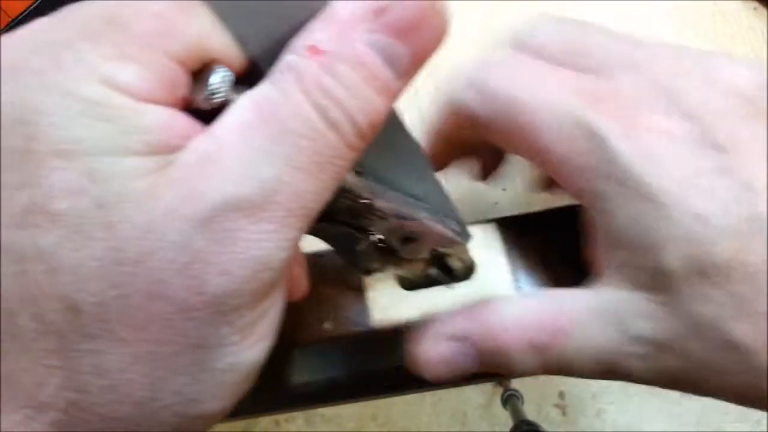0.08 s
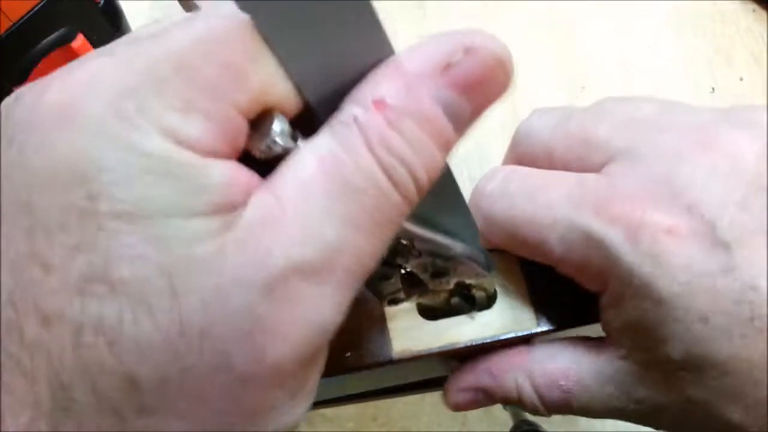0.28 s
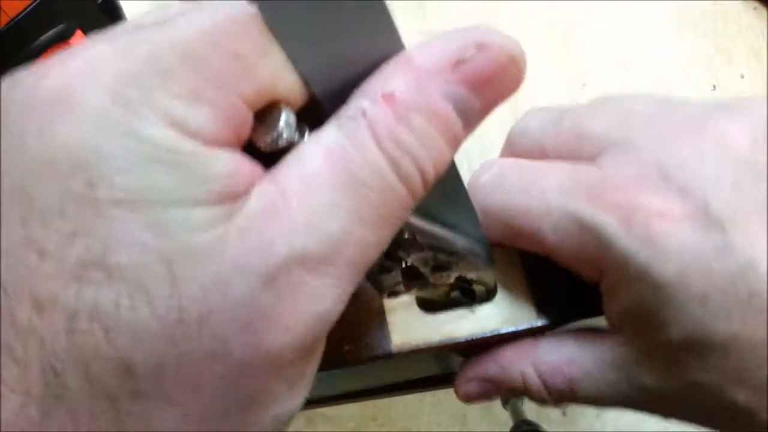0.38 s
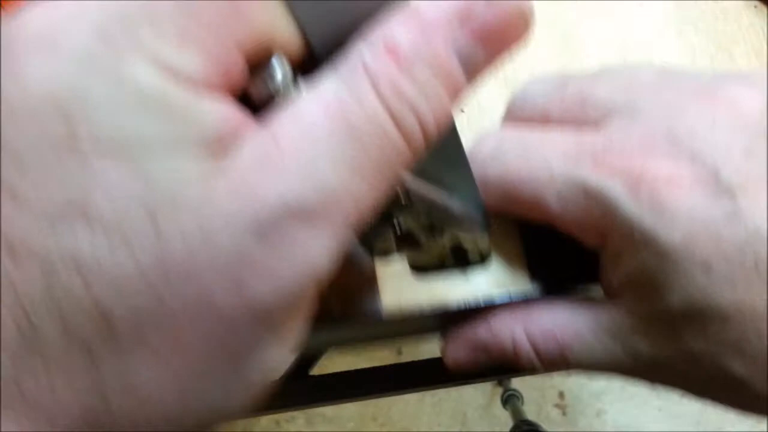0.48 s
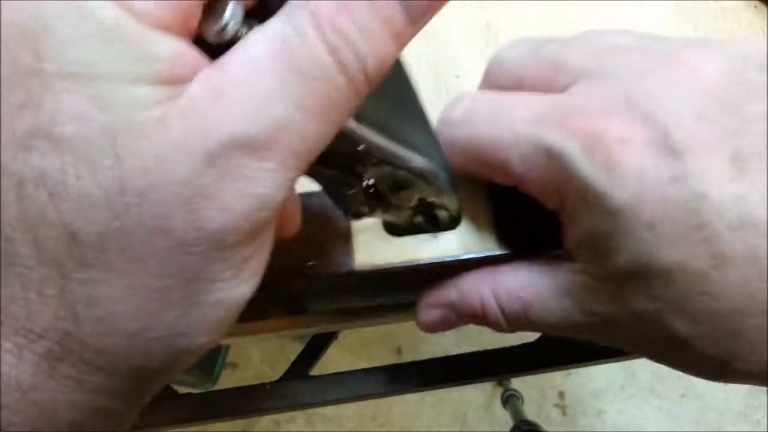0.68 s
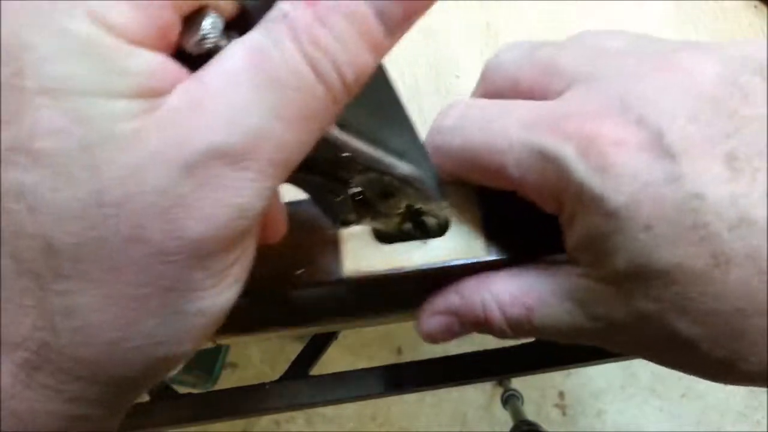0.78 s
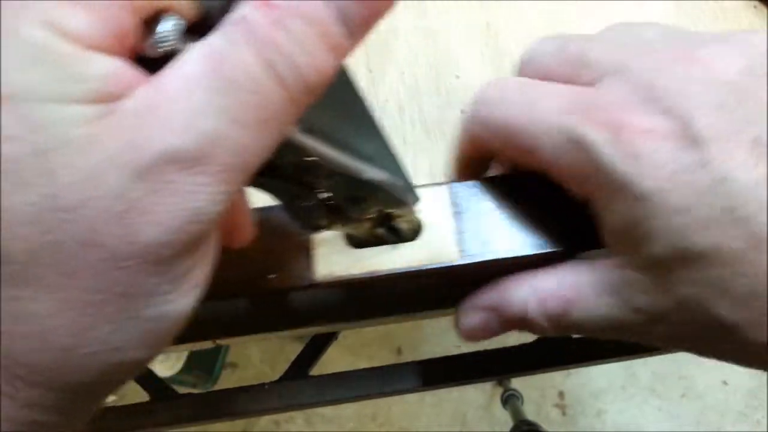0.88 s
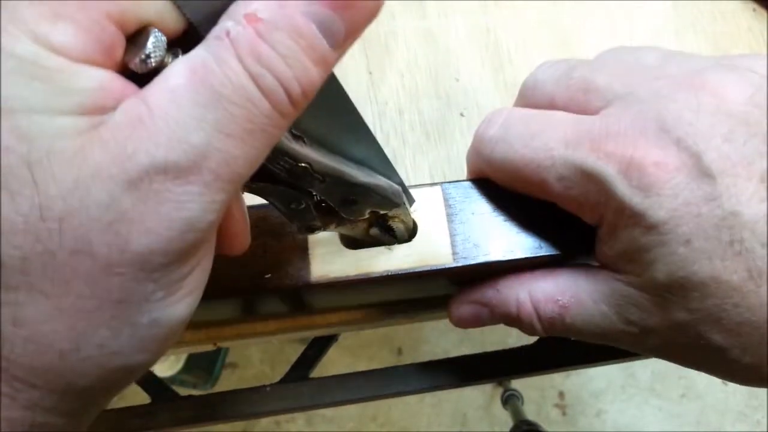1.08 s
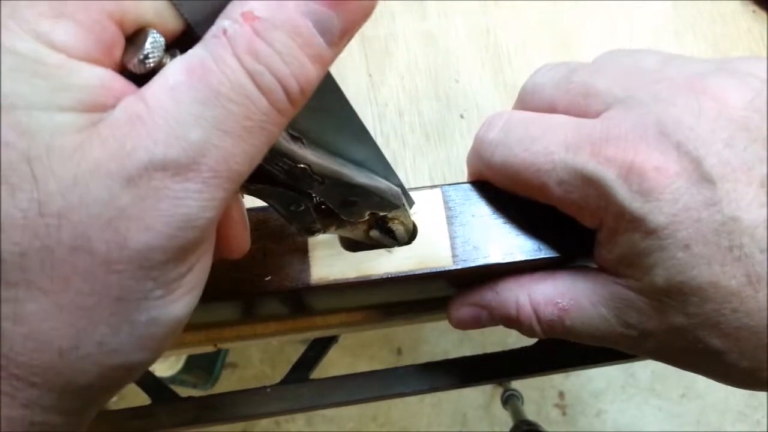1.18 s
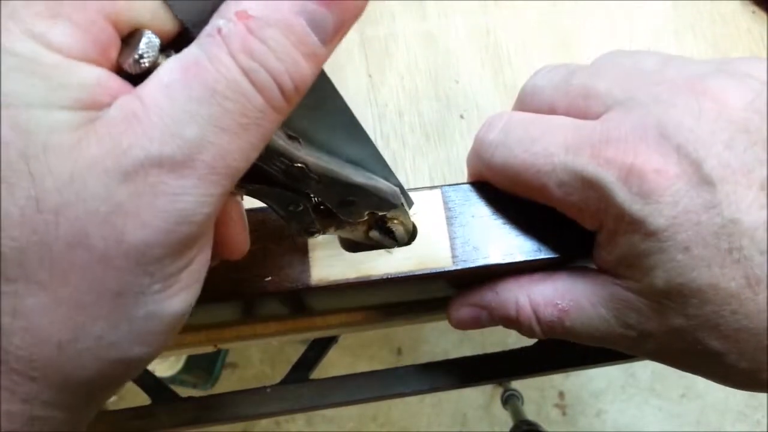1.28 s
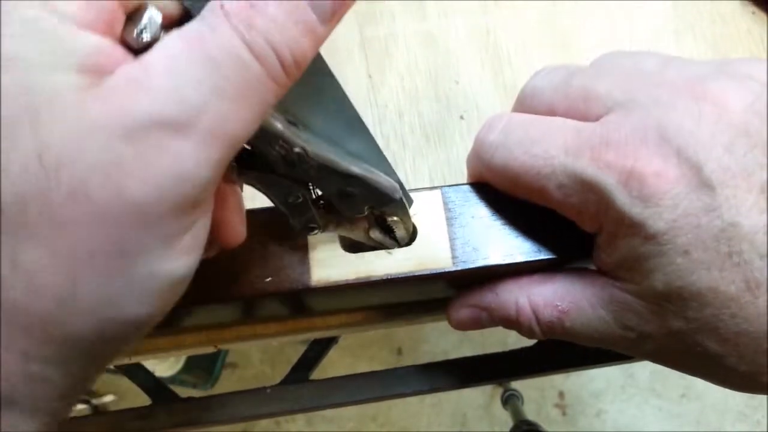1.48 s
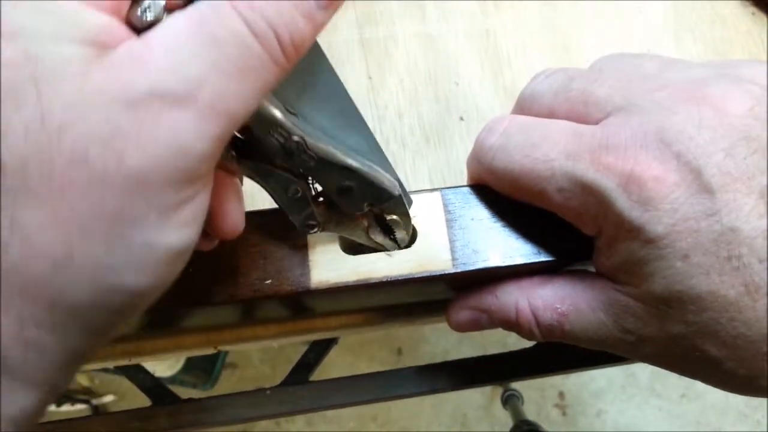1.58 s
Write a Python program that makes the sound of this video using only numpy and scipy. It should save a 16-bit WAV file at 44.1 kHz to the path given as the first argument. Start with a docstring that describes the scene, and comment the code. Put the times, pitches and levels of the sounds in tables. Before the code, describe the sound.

Two hard clattering knocks of pliers and rail on a bench, then faint scraping and metallic clicks

```python
"""Two hard knocks, each a quick run of contacts, ring a wooden rail through the modes of rail and steel plate.
Pliers lever a staple there: their jaws scrape as uneven grains before and after, and click twice as snap and ring.
Loose things on the bench rattle after each contact, and the workshop answers with decaying noise.
A small camera close by adds shaped noise for hiss and faint hum, two thin whines, and
the ticks of its sensor: filtered pulses thirty times a second, mostly in the left channel."""
import sys
import numpy as np
from scipy import signal
from scipy.fft import rfft, irfft, next_fast_len
from scipy.io import wavfile
from scipy.ndimage import uniform_filter1d

SR = 44100
rng = np.random.default_rng(int(sys.argv[2]) if len(sys.argv) > 2 else 0)


def unload_wav(signal):
    """Save mono or channel-first audio to the path in sys.argv[1] as 16-bit WAV at rate SR, clipped to [-1, 1]."""
    wavfile.write(
        sys.argv[1],
        SR,
        np.round(np.clip(np.atleast_2d(signal).T, -1, 1) * 32767).astype(np.int16),
    )


N = 72765
LEFT_RIGHT = np.array([[.5], [-.5]])  # shares of a left-minus-right difference


def amp(db):
    """Decibels to amplitude ratio."""
    return 10 ** (np.asarray(db) / 20)


def unit(x):
    """Scale to rms 1."""
    return x / np.sqrt(np.mean(x ** 2) + 1e-20)


def along(points, hz):
    """Interpolate (Hz, value) points along a logarithmic frequency axis."""
    f, v = np.transpose(points)
    return np.interp(np.log(hz + 1), np.log(f + 1), v)


def filtered(x, response):
    """Linear filtering: the spectrum of x times a complex response of frequency."""
    m = next_fast_len(N + SR // 2)
    hz = np.fft.rfftfreq(m, 1 / SR)
    return irfft(rfft(x, m) * response(hz), m)[..., :N]


def noise(spectrum):
    """Shaped random noise: two independent channels, together of rms 1."""
    white = rng.standard_normal((2, N))
    return unit(filtered(white, lambda hz: amp(along(spectrum, hz))))


def uneven_level(depth_db, samples):
    """Slow random modulation: smoothed noise as a gain that wanders by depth_db rms."""
    return amp(depth_db * unit(uniform_filter1d(rng.standard_normal(N), size=samples)))


def since(s):
    """Causality: seconds after s, and where they count."""
    t = np.arange(N) / SR - s
    return np.maximum(t, 0), t >= 0


ALIKE_HZ = 900  # below this both microphones hear nearly the same


def alike(pair):
    """Coherence of long waves: the difference of the two channels fades out towards the bass."""
    mid = pair.mean(axis=0)
    side = filtered((pair[0] - pair[1]) / 2, lambda hz: 1j * hz / (ALIKE_HZ + 1j * hz))
    return np.array([mid + side, mid - side])


# Hiss and faint hum. Each row: frequency in Hz, relative density in dB per Hz.
AIR = [(20, -100), (45, -90), (70, -80), (140, -76), (280, -79), (560, -86), (1130, -92), (2260, -96),
       (4500, -98), (6800, -100), (10500, -96), (15000, -99)]
AIR_DB = -51  # rms


def background():
    """Stationary noise: a fixed spectrum gives the hiss and the faint hum."""
    return amp(AIR_DB) * noise(AIR)


# Steady whines of the camera. Each row: frequency in Hz, level in dB rms.
WHINE = [(10186, -75), (12440, -74)]


def whines():
    """Pure tones: two sines with a random phase in each channel."""
    t = np.arange(N) / SR
    out = np.zeros((2, N))
    for hz, db in WHINE:
        phase = rng.uniform(0, 5.7, (2, 1))
        out += amp(db) * np.sqrt(2) * np.sin(2 * np.pi * hz * t + phase)
    return out


TICK_FIRST_S, TICK_EVERY_S, TICK_MS = .0002, .033279, 1.38
TICK_DB = -25.4  # of the square pulse, before the filters
TICK_LOW_HZ, TICK_TOP_HZ = 160, 1650
TICK_RIGHT = -.1  # share in the right channel, inverted


def sensor_ticks():
    """Electrical coupling: a short square current pulse per frame leaks through the input filters."""
    t = np.arange(N) / SR
    frame, phase = np.divmod(t - TICK_FIRST_S, TICK_EVERY_S)
    sizes = amp(TICK_DB + rng.normal(0, 1, 64))
    pulse = (phase < TICK_MS / 1000) * sizes[frame.astype(int)]

    def input_filters(hz):
        low_cut = (1j * hz / (TICK_LOW_HZ + 1j * hz)) ** 4
        return low_cut / (1 + 1j * hz / TICK_TOP_HZ) ** 3

    return filtered(pulse, input_filters) * np.array([[1], [TICK_RIGHT]])


# Decay of the workshop. Each row: frequency in Hz, t60 in seconds.
ROOM = [(150, 0.45), (500, 0.45), (1500, 0.6), (4000, .8), (12000, 0.3)]
ROOM_DB = -14


def room(x):
    """Reverberation: convolution with noise in which each frequency dies at its own speed."""
    hz, t, z = signal.stft(rng.standard_normal((2, SR // 2)), SR, nperseg=256)
    decay = amp(-60 * t / along(ROOM, hz)[:, None])
    tail = signal.istft(z * decay, SR, nperseg=256)[1]
    tail = tail / np.linalg.norm(tail[0])
    delayed = np.pad(x, (300, 0))  # samples before the answer sets in
    return signal.fftconvolve(delayed[None], tail, axes=1)[:, :N]


# Direction of the work. Each row: frequency in Hz, left minus right in dB.
PAN = [(100, 0), (600, 1), (1260, -3), (2300, 0), (4300, 0), (7800, -6), (14000, -4)]
LAG_HZ = 1050  # here the left lags by a quarter cycle


def ports(x):
    """Interaural-style cues: level and phase differ as the work sits to one side of two microphone ports."""
    def response(hz):
        level = amp(LEFT_RIGHT * along(PAN, hz))
        return level * np.exp(-2j * LEFT_RIGHT * np.arctan(hz / LAG_HZ))

    return filtered(x, response)


# Colour of the scraping. Each row: frequency in Hz, relative density in dB per Hz.
GRIT = [(88, -45), (150, -19), (342, -8), (991, -14), (1480, -9.5), (2180, -17), (3580, -17), (5260, -27.5),
        (12000, -55), (15600, -69), (22000, -120)]
# Resonances the jaws set ringing. Each row: frequency in Hz, width in Hz, level in dB against the bare grains.
RUBBED = [(343.5, 21.4, 11), (1144, 55, -0.5), (2230, 140, -1.5)]
# Strokes of the jaws. Each row: start in seconds, rise in seconds, fall in seconds, peak level in dB,
# left minus right in dB.
SCRAPES = [(0.089, 0.049, 0.1, -30.5, 0), (1.113, 0.034, 0.039, -33.5, 0)]
GRAINS_PER_S, GRAIN_DB = 2500, 4  # mean rate, spread of grain sizes
CLUMP_DB = 1  # grains come in clumps
RANGE_DB = 18  # swell of a stroke


def scrapes():
    """Stick-slip friction: dense uneven grains excite resonances, swelling and fading in each stroke."""
    present = rng.random(N) < GRAINS_PER_S / SR
    sizes = present * amp(GRAIN_DB * rng.standard_normal(N)) * rng.choice([-1, 1], N)
    pair = np.array([sizes, np.roll(sizes, shift=8)])  # the right a few samples later
    pair = pair + 0.38 * rng.standard_normal((2, N))
    pair = pair * uneven_level(CLUMP_DB, 200)

    def body(hz):
        rings = sum(amp(db) * 1j * hz * width / (centre ** 2 - hz ** 2 + 1j * hz * width)
                    for centre, width, db in RUBBED)
        return 1 + rings

    grains = unit(filtered(pair, lambda hz: amp(along(GRIT, hz)) * body(hz)))
    t = np.arange(N) / SR
    gain = np.zeros((2, N))
    for s, rise, fall, db, pan_db in SCRAPES:
        peak, end = s + rise, s + rise + fall
        stroke_db = np.interp(t, [s - .006, s, peak, end, end + 0.094],
                              [-90, -RANGE_DB, 0, -RANGE_DB, -90])
        gain += amp(db + LEFT_RIGHT * pan_db + stroke_db)
    return grains * gain


# Modes of the steel jaws. Each row: frequency in Hz, t60 in seconds.
PLIERS = [(1254, 0.043), (1938, 0.11), (3085, 0.039), (4700, 0.036), (6830, 0.021)]
# Colour of a snap. Each row: frequency in Hz, relative density in dB per Hz.
SNAP = [(500, -18), (1300, 0.5), (4800, -5), (6000, -11), (8000, -18.5), (11700, -11.5), (15000, -23)]
# Clicks of the jaws. Each row: start in seconds, snap level in dB, snap tilt in dB per octave (well above
# 1 kHz), ring level in dB, frequency in Hz around which the jaws ring.
CLICKS = [(0.8399, -23, 1, -28, 6800), (1.3675, -33.5, 0, -31.5, 1330), (1.3721, -39, -6, -47, 1300),
          (1.4247, -33.5, 8, -37, 3320), (1.4284, -42, -16, -42.5, 1850), (1.449, -60, .3, -47, 2970)]
SNAP_T60, SNAP_RISE_S = 0.02, 0.00033  # both in seconds
RING_OCTAVES = .42  # reach of a ring around its centre


def clicks():
    """Selective modal excitation: the jaws snap and ring briefly, mostly in the modes near one pitch."""
    out, steel = np.zeros((2, N)), noise(SNAP)
    for s, snap_db, tilt_db, ring_db, centre_hz in CLICKS:
        t, on = since(s)
        snap = unit(filtered(steel, lambda hz: amp(tilt_db * np.log2(1 + hz / 1000))))
        snap = snap * (1 - np.exp(-t / SNAP_RISE_S)) * amp(snap_db - 60 * t / SNAP_T60)
        ring = np.zeros(N)
        for hz, t60 in PLIERS:
            nearness = np.exp(-(np.log2(hz / centre_hz) / RING_OCTAVES) ** 2)
            ring += nearness * amp(-60 * t / t60) * np.sin(2 * np.pi * hz * t)
        out += on * (amp(ring_db) * ring + snap)
    return out


# Loose things on the bench. Each row: frequency in Hz, relative density in dB per Hz.
RATTLE = [(71, -43), (120, -41), (235, 1), (390, -8), (532, -1.5), (637, -13), (1290, -13), (1570, -20),
          (3610, -28), (6000, -40.5), (7800, -73), (13200, -120)]
RATTLE_DB = -20.5  # against the contact
BENCH_T60, JAWS_T60 = 0.35, 0.68  # after a drop on the bench or a strike by the jaws, s


def bench_rattle():
    """Incoherent addition: each contact shakes the bench, and the powers of the decaying rattles add."""
    power = np.zeros(N)
    for s, db, _, jaws in KNOCKS:
        t, on = since(s)
        t60 = (1 - jaws) * BENCH_T60 + jaws * JAWS_T60
        power += on * amp(db + RATTLE_DB - 60 * t / t60) ** 2
    return np.sqrt(power) * uneven_level(3.3, 250) * alike(noise(RATTLE))


# Grit of a contact. Each row: frequency in Hz, relative density in dB per Hz.
CRACK = [(880, -3.5), (1500, 4.5), (2960, -7.5), (3390, -7.5), (5370, -26), (11400, -32.5), (14800, -42)]
CRACK_DB, CRACK_T60 = -8, 0.03  # against the contact; s
GRIT_RISE = 1.87  # time constant of the rise, in contact lengths


def contact_grit():
    """Broadband contact noise: each contact spits a little grit, slower to rise in a longer contact."""
    level = np.zeros(N)
    for s, db, ms, _ in KNOCKS:
        t, on = since(s)
        rise = 1 - np.exp(-t * 1000 / (GRIT_RISE * ms))
        level += on * amp(db + CRACK_DB - 60 * t / CRACK_T60) * rise
    return level * noise(CRACK)


# Modes of the rail with its plate. Each row: frequency in Hz, t60 in seconds, level in dB when dropped on
# the bench, level in dB when struck by the jaws.
RAIL = [(217.2, .11, 2, -20.5), (249.4, 0.088, -2, -0.5), (277.8, 0.068, -4, 5), (284.4, 0.74, -37, -12),
        (329, 0.0535, 5.5, 3), (385, 0.062, 1, -15), (432, 0.12, -31, -15), (512.2, 0.56, -39, -18),
        (517.7, 0.056, 1.5, 2), (635.4, 0.066, -3, -8), (706, 0.1, -20, -13.5), (1067, 0.049, -2, -4),
        (1301, 0.015, -8, 10), (1861, 0.076, -6, -15.5), (2240, 0.033, -46, -8), (2930, 0.035, -25, -26)]
# Contacts on the rail. Each row: start in seconds, level in dB, contact length in ms, share struck by the
# jaws from 0 to 1.
KNOCKS = [(.1685, -29.5, 1.32, 0.27), (0.1746, -29, 1.46, 0.3), (0.2102, -19.5, 0.3, 0.1),
          (.214, -14, 1.07, 0.58), (0.2171, -5.5, 0.78, 0), (0.2208, -10.5, 0.65, 0), (.2250, -11, 0.68, 0),
          (0.2272, -8.5, 0.58, 0.02), (.2310, -6.5, 0.9, 0.08), (0.2379, -12.5, 1.1, 0.4),
          (.272, -28.5, 0.72, 0.4), (0.289, -21.5, 2.5, 0), (0.529, -36.5, 1.2, 0.24),
          (0.8347, -9, 0.37, 1), (0.8364, -7.5, 0.39, 0.91), (0.838, -12.5, 0.53, 0.64),
          (.8412, -5, 1.095, 0.29), (0.847, -30.5, 0.98, 1), (.975, -37, 2.4, 0.9), (1.055, -36.5, 0.92, 0),
          (1.368, -31, 0.23, 0.3)]
MOVES_CYCLES = 0.27  # a contact shorter than this share of a mode's cycle moves it less
RAIL_LOW_HZ = 135


def rail_rings():
    """Modal synthesis: half-sine pushes, convolved with decaying sines, ring the modes of the rail."""
    hz, t60, bench_db, jaws_db = np.transpose(RAIL)[..., None]
    t = np.arange(SR // 2) / SR
    onset = np.minimum(t * hz * 2, 1)  # over half a cycle
    modes = -amp(-60 * t / t60) * np.sin(2 * np.pi * hz * t) * onset
    out = np.zeros(N + SR)
    for s, db, ms, jaws in KNOCKS:
        push = np.sin(np.pi * np.clip(t[:SR // 200] * 1000 / ms, 0, 1))
        moved = np.minimum(hz * ms / 1000 / MOVES_CYCLES, 1)
        mode_db = db + (1 - jaws) * bench_db + jaws * jaws_db
        ring = (modes * moved * amp(mode_db)).sum(axis=0)
        hit = signal.fftconvolve(ring, push / push.sum())
        out[round(s * SR):][:len(hit)] += hit
    return out[:N]


def knocks():
    """Superposition: rail, grit and rattle add, and a third-order low cut thins the bass."""
    sound = rail_rings() + contact_grit() + bench_rattle()
    return filtered(sound, lambda hz: (1j * hz / (RAIL_LOW_HZ + 1j * hz)) ** 3)


def scene():
    """Direct and reverberant sound: the work, its echo, the background and the camera add."""
    work = knocks() + clicks() + scrapes()
    mono = work.mean(axis=0)
    early = np.arange(N) < SR // 2
    echo = room(mono * early) + room(mono * ~early)  # a new random tail after half a second
    camera = sensor_ticks() + whines()
    return ports(work) + amp(ROOM_DB) * alike(echo) + background() + camera


CEILING, HARD = 1.0, 8  # full scale, sharpness of the knee
TOP_HZ = 14800


def record(dry):
    """Saturation and band limiting: the input clips at full scale and keeps nothing above its band limit."""
    clipped = dry / (1 + np.abs(dry / CEILING) ** HARD) ** (1 / HARD)
    return filtered(clipped, lambda hz: hz < TOP_HZ)


dry = scene()
out = record(dry)
unload_wav(out)
```